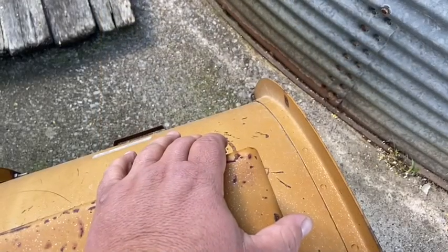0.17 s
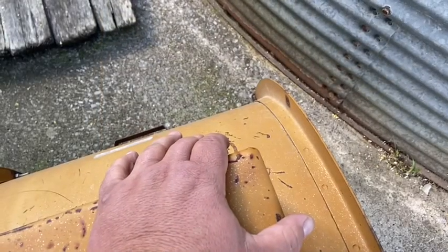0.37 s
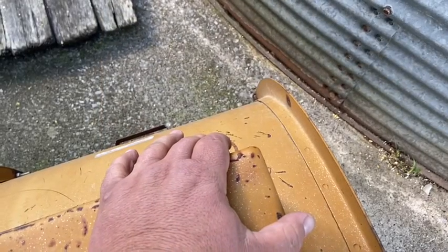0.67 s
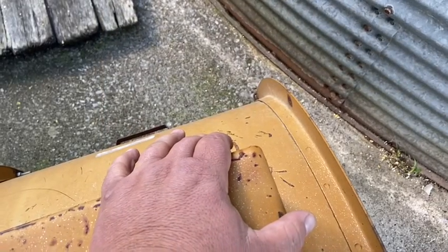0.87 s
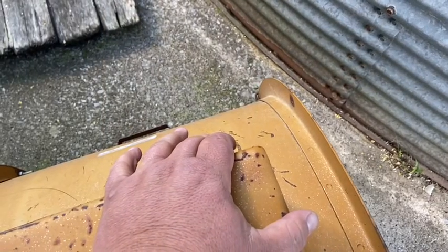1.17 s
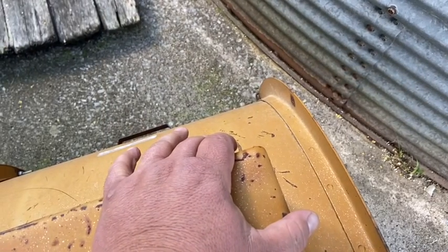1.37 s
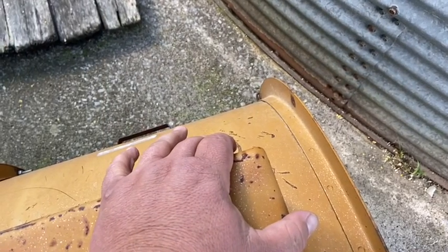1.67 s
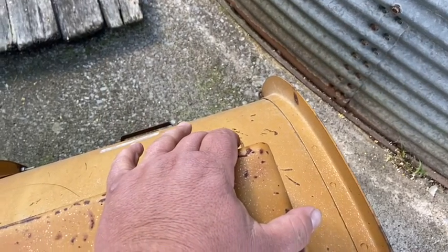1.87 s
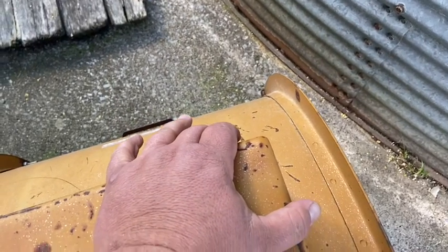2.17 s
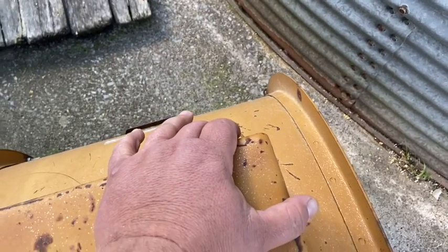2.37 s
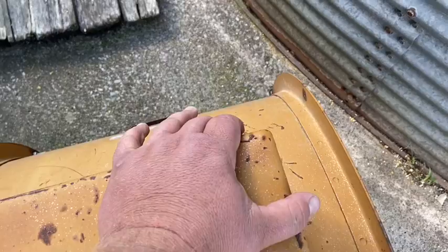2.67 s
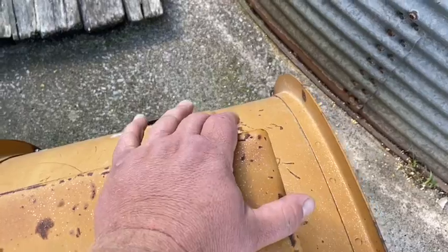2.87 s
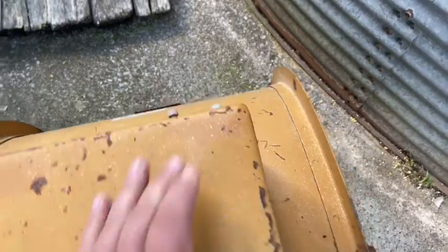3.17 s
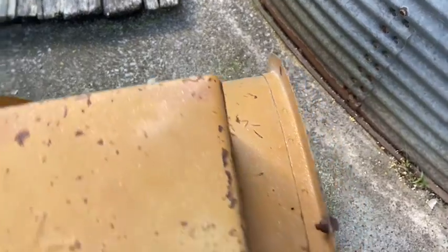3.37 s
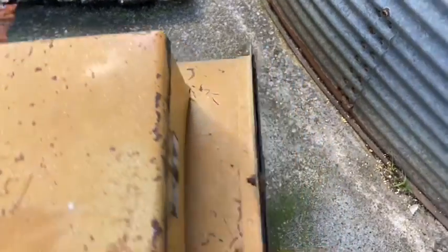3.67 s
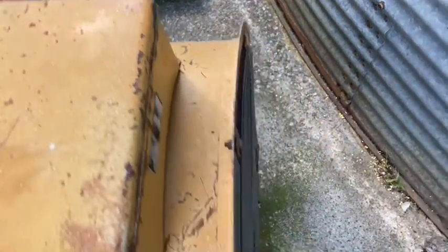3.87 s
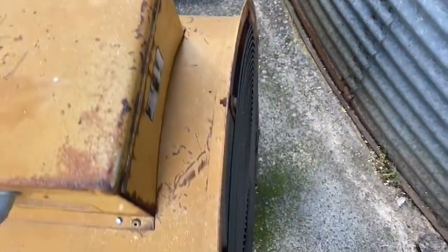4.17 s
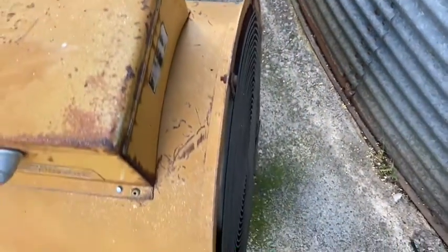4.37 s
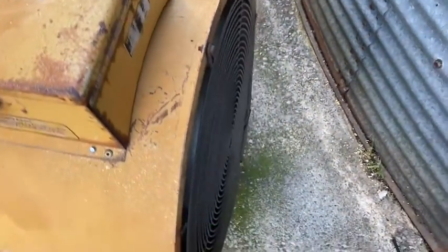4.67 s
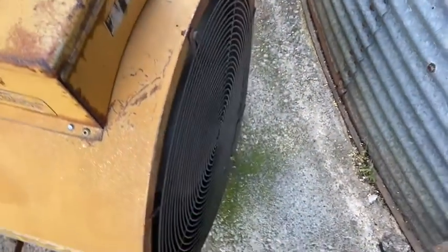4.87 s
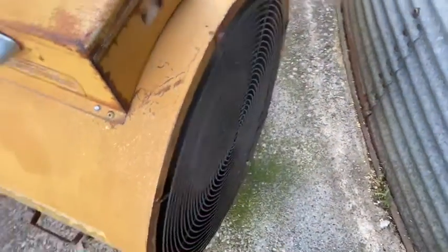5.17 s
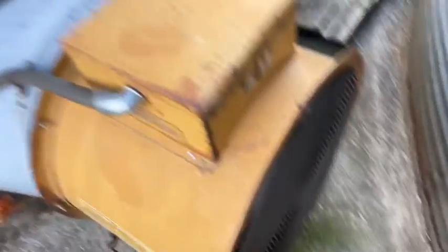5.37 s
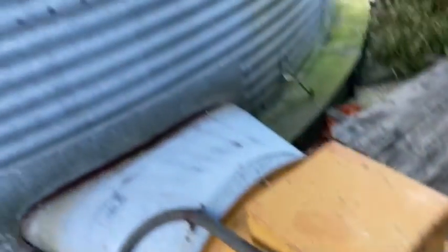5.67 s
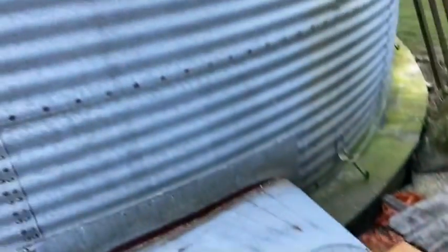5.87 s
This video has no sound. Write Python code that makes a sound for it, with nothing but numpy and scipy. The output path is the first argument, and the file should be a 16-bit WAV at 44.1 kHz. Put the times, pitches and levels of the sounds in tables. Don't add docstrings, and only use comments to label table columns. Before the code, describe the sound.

For the first 1.3 seconds a quiet outdoor yard: low breeze buffeting, faint distant wash and drone, thin crickets and quick, high katydid rasps. Fingers tap softly on a hollow steel box at 0.4 and 0.85, more clearly at 0.95, faintly at 1.07. At 1.3 a hard metallic clack scrapes and bounces shut, the box ringing briefly. A large fan jerks into motion: panels shudder and buzz, electrical hum strains, loose metal ticks until about 2.1, with a tiny high squeak near 2.07. A rough, low, beating growl climbs steadily while air noise swells strongly from 2.2 to 2.7. By 3.3 the roar is full and close, peaking near 3.9; the blade tone keeps rising and levels around 4.4 into a steady mid-low hum. From 5.3 the microphone turns away and roar and hum drop, still running at 6.0.

```python
import sys
import numpy as np
from scipy import signal
from scipy.fft import rfft, irfft, next_fast_len
from scipy.io import wavfile
from scipy.ndimage import uniform_filter1d

SR = 44100
rng = np.random.default_rng(int(sys.argv[2]) if len(sys.argv) > 2 else 0)


def boost(x):
    u = np.asarray(x, float) / 20
    return 10 ** u


def wav_record(signal):
    frames = np.transpose(np.atleast_2d(signal))
    bounded = np.clip(frames, -1, 1)
    quanta = np.round(bounded * 32767).astype(np.int16)
    wavfile.write(sys.argv[1], SR, quanta)


N = 265085

# time in seconds, blade passing frequency in Hz.
ROTOR_SPEED = [(1.4, 72), (1.53, 86), (1.81, 118), (2.0, 138), (2.18, 166), (2.35, 194), (2.7, 251.5),
               (2.93, 297.5), (3.08, 332), (3.25, 355.5), (3.59, 391.4), (3.75, 411.6), (4.07, 449.6),
               (4.19, 461.5), (4.37, 467.4), (4.5, 468.9), (4.9, 469.5), (6.01, 468.8)]
# time in seconds, strength in dB.
FLOW = [(1.4, -33.5), (1.9, -30.5), (2.2, -27), (2.45, -22), (2.65, -18.5), (3.0, -18), (3.3, -16.5),
        (3.45, -17), (3.9, -16), (4.1, -17.5), (4.33, -17.5), (4.6, -20), (5.02, -20.5), (5.17, -20),
        (5.45, -23.5), (5.65, -26), (6.01, -29.5)]
# frequency in Hz, density in dB per Hz.
TICK_COLOUR = [(1500, -38), (4000, -4), (7000, 4.0), (12000, -0.5), (15500, -13)]


def evened(x):
    return x / np.sqrt(np.mean(abs(x) ** 2) + 1e-20)


def read(points, hz):
    f, value = np.transpose(points)
    return np.interp(np.log(hz + 1), np.log(f + 1), value)


def curves(rows, t):
    s, *columns = np.transpose(rows)
    return [np.interp(t, s, c) for c in columns]


def frame_grid(size):
    return np.arange(4 * N // size + 5) * size / 4 / SR, np.fft.rfftfreq(size, 1 / SR)


def noise(power, size):
    a, b = rng.standard_normal((2, 2, *power.shape))
    z = (a + 1j * b) * np.sqrt(power) * np.sqrt(3 / 8)
    return signal.istft(z.transpose(0, 2, 1), nperseg=size, noverlap=3 * size // 4)[1][:, :N]


def drift(shape, frames, bins):
    over_time = uniform_filter1d(rng.standard_normal(shape), int(frames), 0)
    return evened(uniform_filter1d(over_time, int(bins), 1))


def steady(colour, level_rows, size, patchy_db):
    t, hz = frame_grid(size)
    shape = boost(2 * read(colour, hz)) * (hz > 15)
    level_db = curves(level_rows, t)[0][:, None]
    patches = drift((len(t), len(hz)), frames=5.5, bins=6.7)
    return noise(boost(2 * (level_db + patchy_db * patches)) * shape / shape.sum(), size)


def add(mix, s, sound):
    part = mix[..., round(s * SR):][..., :sound.shape[-1]]
    part += sound[..., :part.shape[-1]]


def ring(modes):
    t = np.arange(9000) / SR
    return sum(boost(db - 60 * t / t60) * np.sin(2 * np.pi * hz * t) for hz, db, t60 in modes)


def burst(db, t60, colour):
    size = 4096
    white = rng.standard_normal((2, size))
    shaped = evened(irfft(rfft(white) * boost(read(colour, np.fft.rfftfreq(size, 1 / SR)))))
    return shaped * boost(db - 60 * np.arange(size) / SR / t60)


def resonate(x, hz, width):
    turn, r = np.exp(2j * np.pi * hz * np.arange(N) / SR), np.exp(-np.pi * width / SR)
    once = signal.lfilter([1 - r], [1, -r], x / turn)
    twice = signal.lfilter([1 - r], [1, -r], once)
    return (turn * twice).real


def swells(rows, t):
    return np.sqrt(sum(boost(2 * db) * np.exp(-8 * ((t - s) / length) ** 2) for s, length, db in rows))


def slow_noise(size):
    once = uniform_filter1d(rng.standard_normal((2, N)), size=size)
    return evened(uniform_filter1d(once, size=size))


def far_wash():
    # frequency in Hz, density in dB per Hz.
    wash_colour = [(60, -9), (100, -9), (150, -4.5), (240, -16), (290, 0), (350, -26), (450, -15.5),
                   (750, -27), (1800, -27), (2200, -28), (4000, -37), (8000, -42.5), (13000, -52.5),
                   (15500, -49)]
    return steady(wash_colour, [(0, -36)], size=1024, patchy_db=1.5)


def breeze():
    # time in seconds, buffet in dB.
    wind = [(0.0, -60), (0.03, -25), (1.1, -21.5), (1.4, -25.5), (1.9, -34), (2.6, -26), (3.05, -45),
            (3.8, -58), (6.01, -56)]
    # frequency in Hz, density in dB per Hz.
    buffet_colour = [(12, -36), (20, 0.5), (43, -7.5), (81, -7.5), (103, -13.5), (130, -44), (170, -59),
                     (290, -120)]
    # frequency in Hz, width in Hz, level in dB against the buffet.
    hz, width, drone_db = (42.3, 5.7, -11.5)
    buffet = steady(buffet_colour, wind, size=4096, patchy_db=4.5)
    drone = evened(resonate(rng.standard_normal(N), hz, width))
    return buffet + boost(drone_db + curves(wind, np.arange(N) / SR)[0]) * drone


def insects():
    # frequency in Hz, width in Hz, level in dB.
    crickets = [(4200, 170, -68.5), (5450, 200, -74)]
    # time in seconds, level in dB.
    chirps = [(0.0338, -53), (0.1785, -55), (0.3144, -54), (0.4544, -55), (0.615, -57), (0.7607, -54),
              (0.9148, -55), (1.065, -59), (1.2176, -57)]
    # frequency in Hz, density in dB per Hz.
    wing_colour = [(8000, -30), (9000, -4), (10200, 8), (11200, -10), (12300, 8), (13200, -30)]
    wing = steady(wing_colour, [(0, 0)], size=256, patchy_db=2.0)
    gate = np.zeros(N)
    for s, db in chirps:
        add(gate, s - .004, boost(db) * np.hanning(1700))
    out = wing * gate
    for hz, width, db in crickets:
        out += boost(db) * evened(resonate(rng.standard_normal(N), hz, width))
    return out


def finger_taps():
    # time in seconds, knock in dB, tick in dB.
    taps = [(0.411, -46, -62), (0.846, -44, -58), (0.954, -28, -52), (1.066, -46, -59)]
    # frequency in Hz, level in dB, 60 dB decay time in seconds.
    box_modes = [(860, -16, .05), (1000, 0, .1), (1190, -5, .08), (1300, -7, .07), (1420, -2, .08),
                 (1520, -6, .06), (1630, -3, .07), (2260, -15, .04)]
    out = np.zeros((2, N))
    for s, knock_db, tick_db in taps:
        pad = rng.standard_normal(400) * np.hanning(400)
        add(out, s, boost(knock_db - 25.5) * np.convolve(ring(box_modes), pad)[None])
        add(out, s, burst(tick_db + 8.5, 0.053, TICK_COLOUR))
    return out


def contactor():
    # time in seconds, level in dB, 60 dB decay time in seconds.
    blows = [
        (1.285, -37, 0.08),
        (1.305, -5.5, 0.036),
        (1.31, -16, 0.018),
        (1.313, -12, 0.054),
        (1.32, -20.5, 0.081),
    ]
    # frequency in Hz, density in dB per Hz.
    blow_colour = [(200, 1), (1000, -13), (2500, -4.5), (4000, -3.5), (7000, -6), (10000, -10.5),
                   (15500, -21)]
    # frequency in Hz, level in dB, 60 dB decay time in seconds.
    box_ring = [(173, -14, 0.24), (317, -14, 0.1), (423, -23, 0.55), (472, -13, 0.059)]
    out = np.zeros((2, N))
    for s, db, t60 in blows:
        add(out, s, burst(db, t60, blow_colour))
    scrape = burst(-15.5, 0.029, blow_colour)[:, ::-1]
    add(out, 1.304 - scrape.shape[1] / SR, scrape)
    add(out, 1.305, (ring(box_ring) * np.clip(np.arange(9000) / 260, 0, 1))[None])
    return out


def panels():
    # frequency in Hz, width in Hz.
    modes = [(425.3, 22.3), (294, 10.3), (2160, 93), (1040, 88)]
    # middle in seconds, length in seconds, level in dB.
    shudders = [
        [(1.34, 0.086, -25), (1.53, 0.13, -24), (1.635, 0.073, -20), (1.745, 0.11, -20), (1.87, 0.11, -21),
         (2.02, 0.2, -20.5), (2.16, 0.15, -16.5), (2.42, 0.32, -27.5), (2.75, 0.14, -15.5)],
        [(2.14, 0.21, -25.5), (2.42, 0.26, -21.5), (2.62, 0.065, -27), (2.93, 0.22, -24.5), (3.16, .17, -23),
         (3.3, .07, -28), (3.5, 0.44, -27.5), (3.73, 0.085, -25)],
        [(1.62, .3, -39.5), (1.86, .12, -36), (2.03, .3, -49), (2.28, 0.39, -33)],
        [(2.6, 0.14, -21), (2.87, 0.61, -26.5), (3.1, 0.11, -21), (3.22, 0.25, -31)],
    ]
    t, out = np.arange(N) / SR, 0
    for (hz, width), rows in zip(modes, shudders):
        free = evened(resonate(rng.standard_normal((2, N)), hz, 2.2 * width))
        driven = free / (abs(uniform_filter1d(free ** 2, size=1200)) + .1) ** .35
        out = out + evened(driven) * swells(rows, t)
    return out * np.clip((t - 1.305) / .008, 0, 1)


def air():
    # frequency in Hz, density in dB per Hz.
    air_colour = [(30, -47), (60, -35), (150, -37.5), (400, -14), (900, -5), (2000, -4.5), (3200, -14.5),
                  (5500, -24), (7000, -26), (9000, -31.5), (12000, -36), (15500, -39.5)]
    # multiple of blade passing, width as multiple, height in dB.
    stall_humps = [(.25, .04, 14.5), (1.22, .12, -9), (1.65, .13, 9), (2.15, .1, -6), (2.52, .07, 1.5),
                   (2.65, .17, 6.5), (3.6, .2, 5.5), (4.4, .3, 1.5)]
    # frequency in Hz, width in Hz, height in dB.
    housing = [(121, 16, 7.5), (177, 10, 5), (582, 29, 8), (810, 110, -4), (7700, 800, 2.5),
               (11500, 2900, 6.5)]
    # time in seconds, stall depth 0-1, housing shake 0-1, bin wall lift in dB.
    strain = [(1.3, 0.1, 0.7, 1), (1.9, .5, 0.8, 0), (2.2, 0.35, 0.96, -0.5), (2.8, 0.83, 0.7, 1),
              (3.3, 0.98, 0.6, -0.5), (3.8, .9, 0.4, 0), (4.2, 0.49, 0.14, -3.5), (5.2, 0.93, 0.36, -1.5),
              (5.45, 0.54, 0.01, 3.5), (6.01, 0.75, 0.04, -2.5)]
    # frequency in Hz, width in Hz.
    wall_hz, wall_width = (2650, 350)
    # low edge in Hz, high edge in Hz.
    edges = [
        (70, 230),
        (500, 850),
        (850, 3000),
        (3000, 7500),
    ]
    # base in dB, dB per unit speed, dB per speed cubed, share of the flow, tail of the clack in dB.
    laws = [
        (22, -34.5, -1.5, 1.006, 14),
        (-4, 10, -14.5, 0.78, -4),
        (3, 1.03, 1.87, 1.047, 24),
        (3.5, -22, 16, 1.083, 17),
    ]
    away_db = [-0.6, -0.52, -2, 2.5]

    t, hz = frame_grid(1024)
    blade_hz = curves(ROTOR_SPEED, t)[0][:, None]
    stall, shake, wall_db = (c[:, None] for c in curves(strain, t))
    humps_db = sum(db * np.exp(-.5 * ((hz / blade_hz - k) / w) ** 2) for k, w, db in stall_humps)
    rings_db = sum(db * np.exp(-.5 * ((hz - f) / w) ** 2) for f, w, db in housing)
    echo_db = wall_db * np.exp(-.5 * ((hz - wall_hz) / wall_width) ** 2)
    power = boost(2 * (read(air_colour, hz) + stall * humps_db + shake * rings_db + echo_db))

    speed, flow_db = blade_hz[:, 0] / blade_hz[-1], curves(FLOW, t)[0]
    clack_tail = np.exp(-np.maximum(t - 1.33, 0) / 0.0092)
    layers_db = np.array([base + per * speed + cubed * speed ** 3 + share * flow_db + tail_db * clack_tail
                          for base, per, cubed, share, tail_db in laws])
    layers_db += np.outer(away_db, 1 / (1 + np.exp((5.3 - t) / 0.033)))
    band_db = [10 * np.log10(power[:, (hz >= lo) & (hz < hi)].sum(1)) for lo, hi in edges]
    lift_db = layers_db - np.array(band_db)
    middles = np.sqrt(np.prod(edges, axis=1))
    shares = np.array([read(np.transpose([middles, row]), hz) for row in np.eye(4)])

    gusts = drift(power.shape, frames=4.8, bins=14) + .5 * drift(power.shape, frames=3.4, bins=190)
    gusts += 2.5 * drift(power.shape, frames=60, bins=1.8)
    start = np.clip((np.arange(N) / SR - 1.325) / 0.024, 0, 1)
    return noise(power * boost(2 * (lift_db.T @ shares + .9 * gusts)), 1024) * start


def blade_tone(angle, t):
    # time in seconds, tone in dB.
    tone = [(1.45, -42), (1.9, -36), (2.1, -26), (2.3, -24), (2.47, -27), (2.72, -21), (3.15, -25),
            (3.42, -31), (3.78, -25), (4.0, -31), (4.3, -25.5), (5.3, -26.5), (5.58, -36.5), (6.0, -34.5)]
    # time in seconds, share of the tone's power that wobbles.
    roughness = [(1.4, .7), (1.9, .4), (2.1, .08), (2.6, .04), (3, .03), (6.01, .015)]
    # middle in seconds, length in seconds, dB.
    octave_swells = [(2.81, .2, -34), (3.95, .3, -36), (5.15, .8, -36), (5.85, .5, -42)]
    (tone_db,), (rough,) = curves(tone, t), curves(roughness, t)
    wobble = slow_noise(2200)
    unsteady = wobble[0] * np.cos(angle) + wobble[1] * np.sin(angle)
    blade = np.sqrt(1 - rough) * np.cos(angle) + np.sqrt(rough / 2) * unsteady
    octave = (boost(-46) + swells(octave_swells, t)) * boost(2.5 * wobble[1])
    return boost(tone_db) * blade + octave * np.cos(2 * angle + 0.99 * wobble[0])


def stall_tone(angle, t, cells):
    # time in seconds, level in dB.
    subtone = [(1.4, -32), (1.75, -25.5), (2.05, -29), (2.2, -22), (2.4, -24.5), (2.65, -20), (2.8, -28.5),
               (3.2, -28.5), (3.8, -34), (4.4, -41.5), (6.01, -41.5)]
    slow = .755 * angle
    return boost(curves(subtone, t)[0] - 5.5) * (cells[0] * np.cos(slow) + cells[1] * np.sin(slow))


def shaft_orders(angle, t, hz, waver):
    # multiple of the turn, level in dB at full speed, power of speed.
    orders = [(1, -42, 2), (2, -40, .1), (20, -47, 3), (24, -50, 3), (40, -50, 3)]
    blades = 8
    out = sum(boost(db) * np.cos(round(k) * angle / blades + 0.48 * waver) * (hz / hz[-1]) ** power
              for k, db, power in orders)
    return out * boost(1.4 * (curves(FLOW, t)[0] + 17))


def mains_hum(t, cells, waver):
    # frequency in Hz, level in dB.
    hum = [(120, -51), (360, -35)]
    out = sum(boost(db + 6.9 * waver) * np.cos(2 * np.pi * f * t + cells[0]) for f, db in hum)
    return out * np.clip((2.6 - t) / 0.59, 0, 1)


def rotor():
    t = np.arange(N) / SR
    hz = uniform_filter1d(curves(ROTOR_SPEED, t)[0], size=4000)
    angle = 2 * np.pi * np.cumsum(hz) / SR
    waver = np.interp(t, np.linspace(0, t[-1], 200), rng.standard_normal(200))
    cells = slow_noise(1900)
    out = blade_tone(angle, t) + stall_tone(angle, t, cells)
    out += shaft_orders(angle, t, hz, waver) + mains_hum(t, cells, waver)
    out *= np.sqrt(2) * np.clip((t - 1.36) / 0.084, 0, 1)
    return np.array([out, -out])


def rattles():
    # time in seconds, level in dB.
    ticks = [(1.438, -48), (1.493, -48), (1.533, -47), (1.5544, -46), (1.6067, -43.5), (1.7794, -47),
             (1.842, -55), (2.1237, -44.5)]
    out = np.zeros((2, N))
    for s, db in ticks:
        add(out, s, burst(db + 14, .05, TICK_COLOUR))
    return out


def squeak():
    s, hz, db, length = (2.066, 7200, -31, .024)
    out = np.zeros((2, N))
    t = np.arange(0, length, 1 / SR)
    add(out, s, boost(db) * np.hanning(len(t)) * np.sin(2 * np.pi * hz * t)[None])
    return out


def scene():
    quiet_yard = far_wash() + breeze() + insects()
    starter = finger_taps() + contactor()
    fan = panels() + air() + rotor()
    return quiet_yard + starter + fan + rattles() + squeak()


def top_cut(x):
    return signal.sosfilt(signal.butter(12, 16950, fs=SR, output="sos"), x)


def record(dry):
    # frequency in Hz, likeness of the ports 0-1.
    likeness = [(60, .98), (200, .95), (400, .9), (700, .72), (1400, .62), (2400, .5), (4300, .65),
                (5800, .45), (6500, .97), (16000, .97)]
    # frequency in Hz, phase by which left leads in radians.
    phase_lead = [(100, -0.25), (400, -0.59), (1000, -1.59), (1600, -1.28), (2500, -0.73), (3100, 0.99),
                  (4000, 0.33), (6500, -0.58)]
    # frequency in Hz, left minus right in dB.
    port_tilt = [(60, -5), (110, 3), (200, 0.5), (380, 4), (700, -8), (1290, -6.5), (2380, 2.5),
                 (4400, 4.5), (8120, 2), (15000, 1.5)]
    # time in seconds, share of the tilt.
    leaning_share = [(0, 0.45), (1.3, 0.4), (2, 0.7), (3, 0.78), (4.5, 0.6), (6.01, 0.64)]
    size = next_fast_len(N + 4096)
    hz = np.fft.rfftfreq(size, 1 / SR)
    a, b = rfft(dry, size) / (1 + (37 / (hz + 1)) ** 10) * (hz < 15900)
    same = np.clip(read(likeness, hz), 0, 1)
    lead = np.where(hz > 6400, -2 * np.pi * (hz - 6880) / 4220, read(phase_lead, hz))
    shared, apart = np.sqrt((1 + same) / 2) * a, np.sqrt((1 - same) / 2) * b
    turn, tilt = np.exp(.5j * lead), boost(.5 * read(port_tilt, hz))
    level = np.array([(shared + apart) * turn, (shared - apart) / turn])
    square = irfft(level, size)[:, :N]
    leaning = irfft(level * np.array([tilt, 1 / tilt]), size)[:, :N]
    lean = curves(leaning_share, np.arange(N) / SR)[0]
    ports = square + lean * (leaning - square)
    knee, room = .7, .24
    over = np.maximum(abs(ports) - knee, 0)
    ports = np.sign(ports) * (np.minimum(abs(ports), knee) + room * np.tanh(over / room))
    return top_cut(ports)


dry = scene()
out = record(dry)
wav_record(out)
```